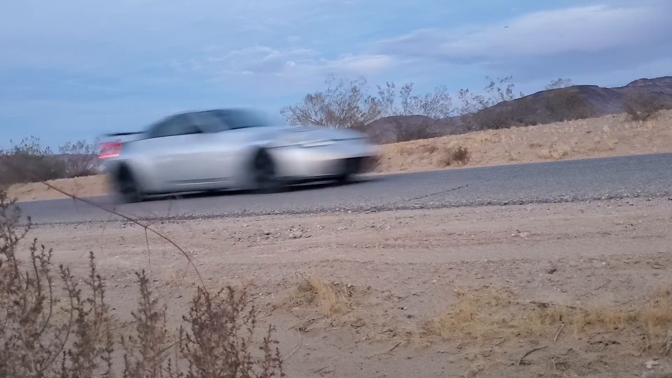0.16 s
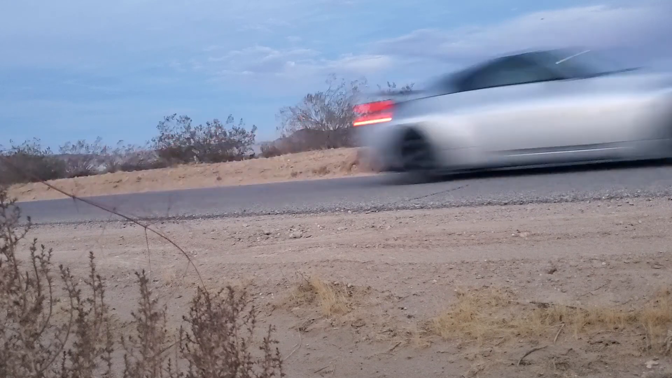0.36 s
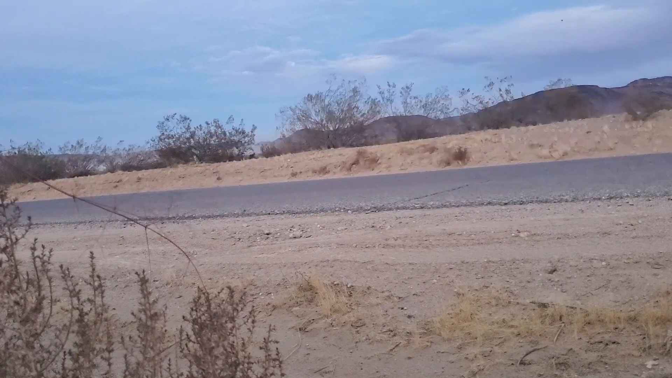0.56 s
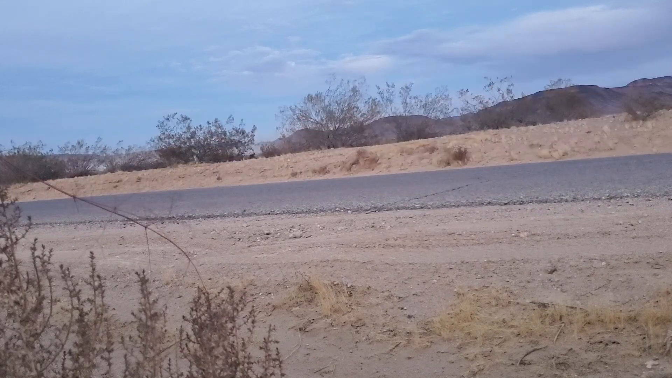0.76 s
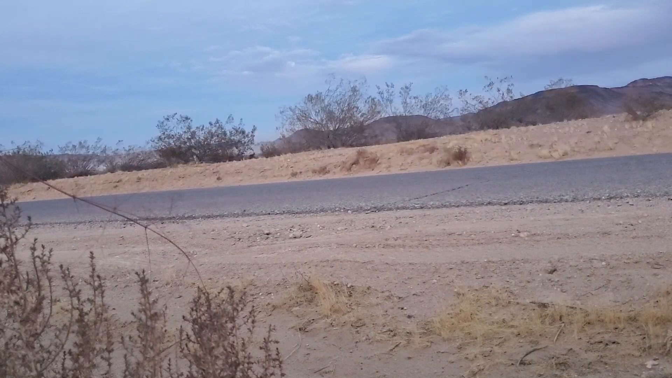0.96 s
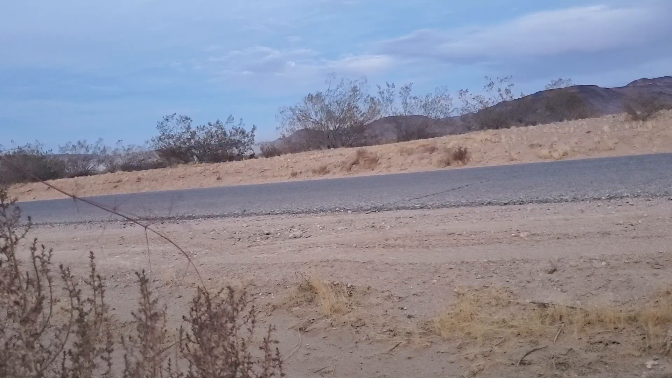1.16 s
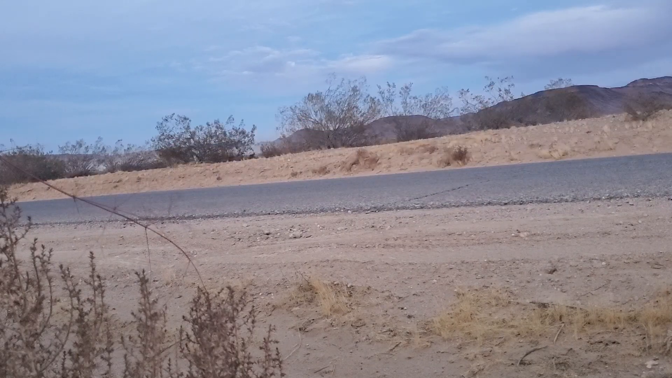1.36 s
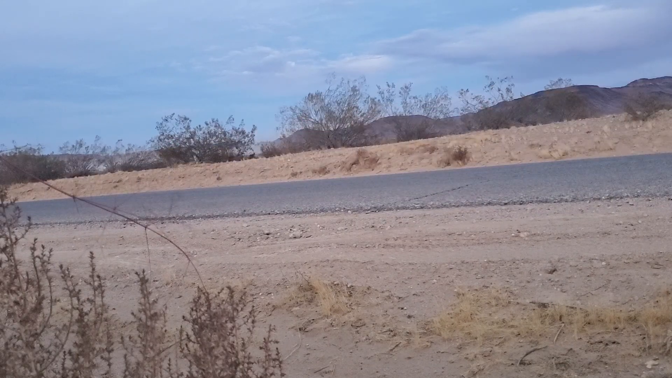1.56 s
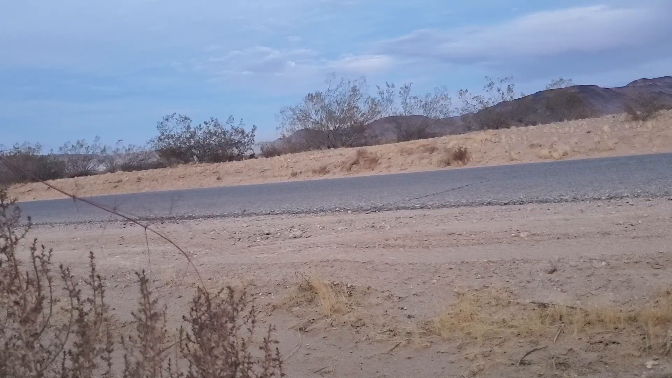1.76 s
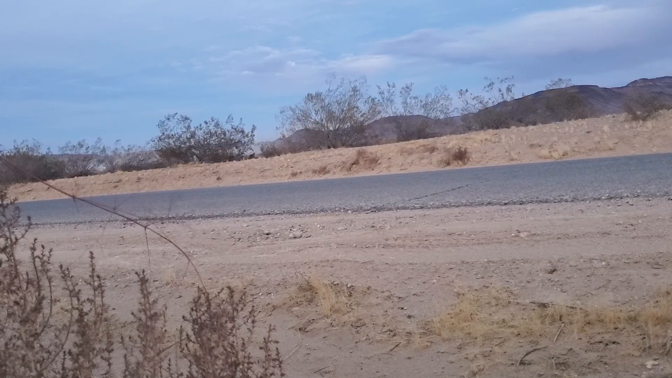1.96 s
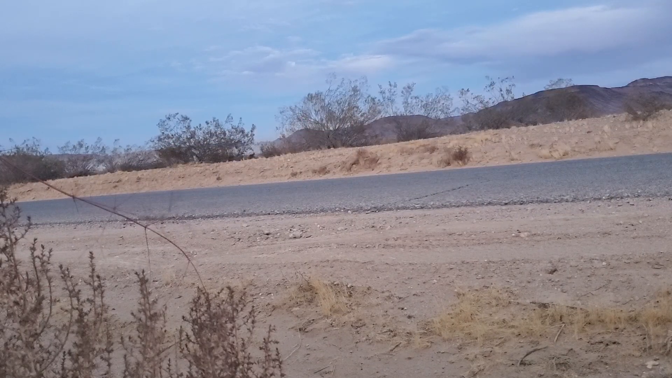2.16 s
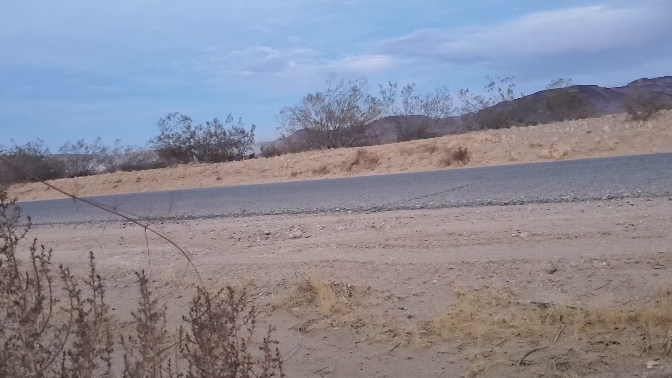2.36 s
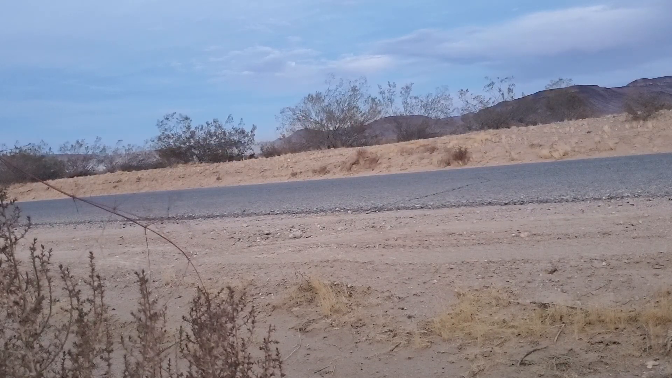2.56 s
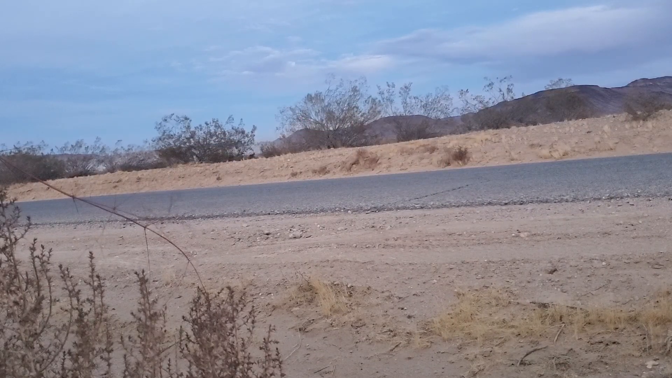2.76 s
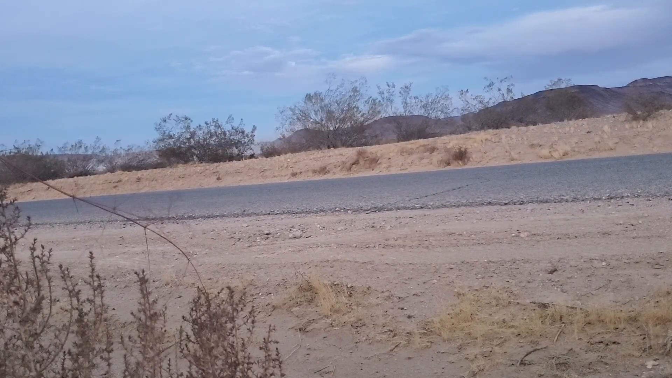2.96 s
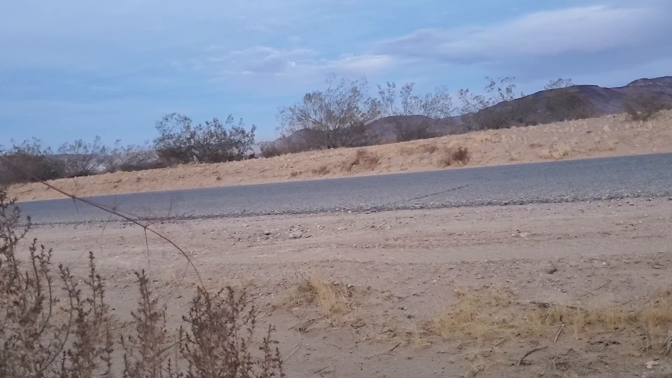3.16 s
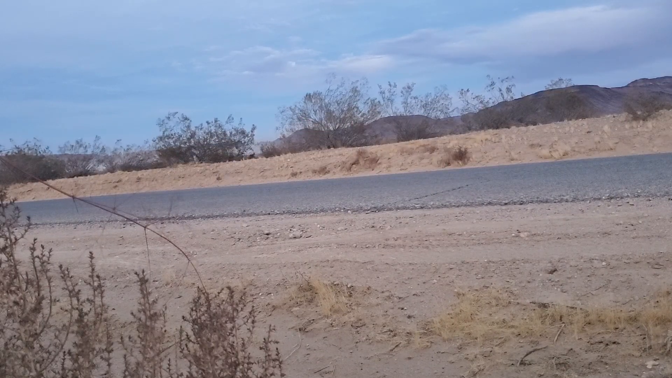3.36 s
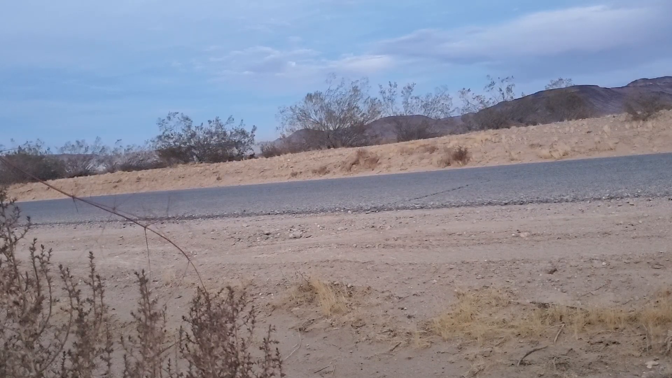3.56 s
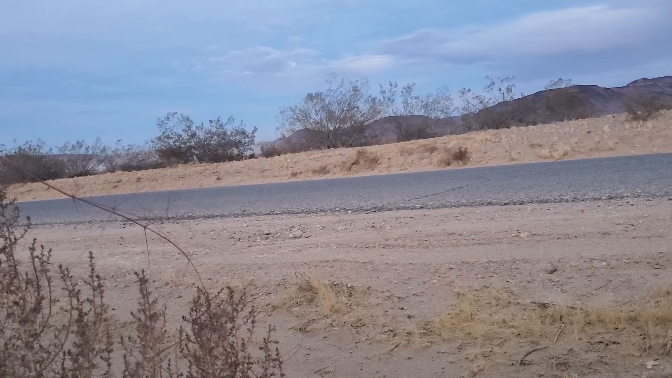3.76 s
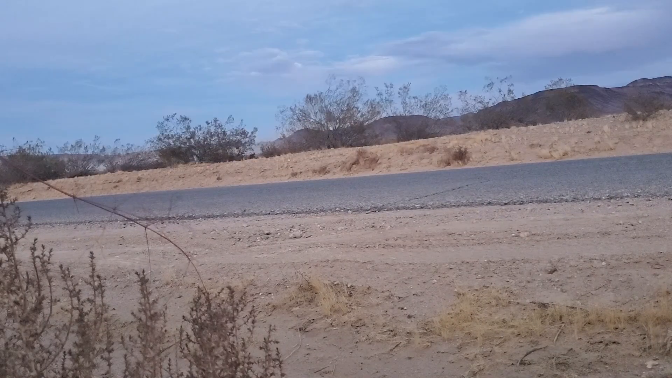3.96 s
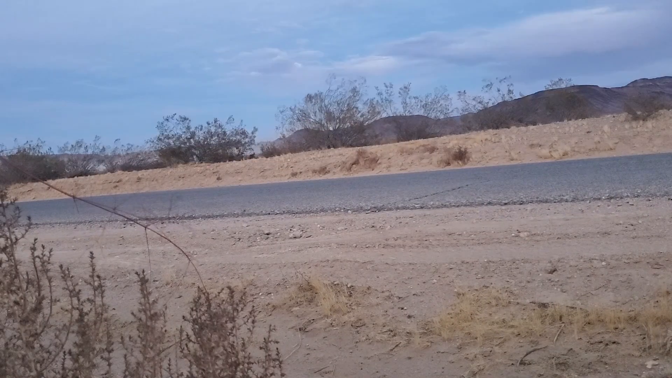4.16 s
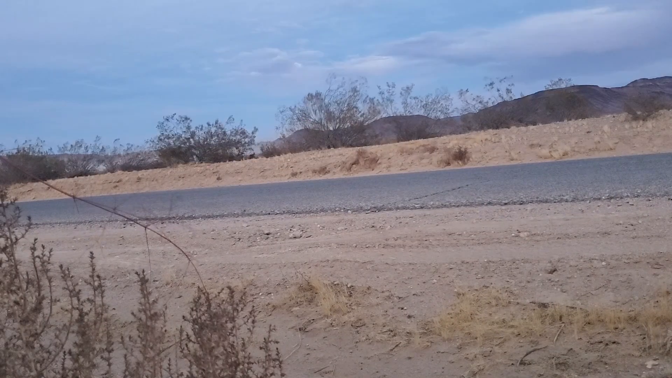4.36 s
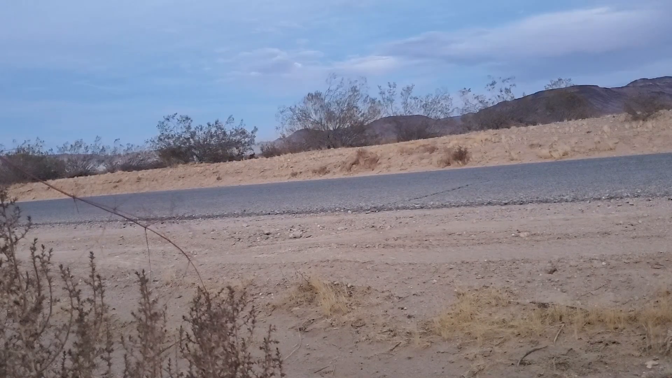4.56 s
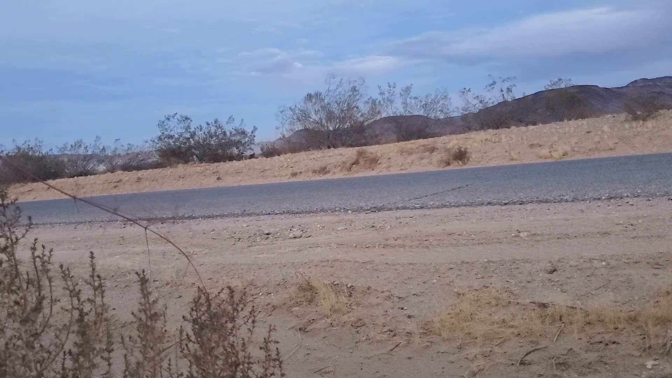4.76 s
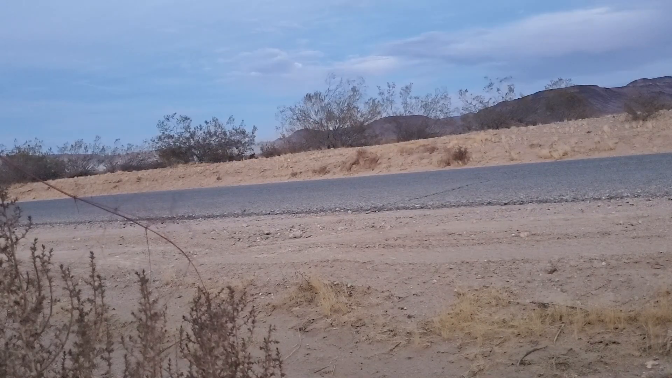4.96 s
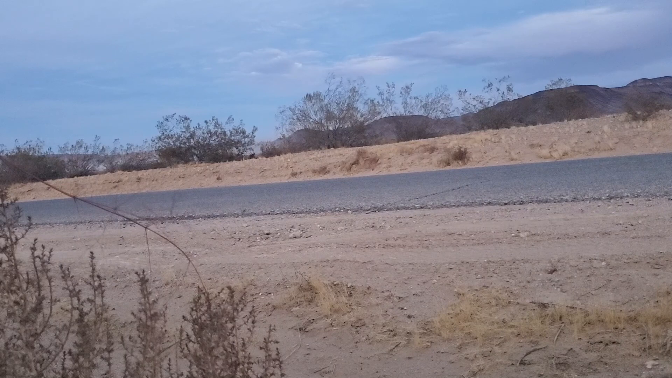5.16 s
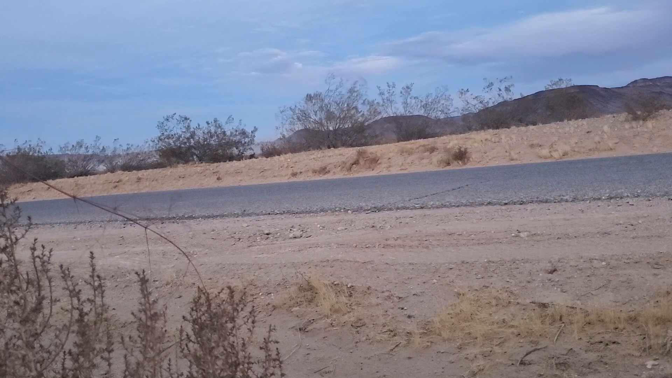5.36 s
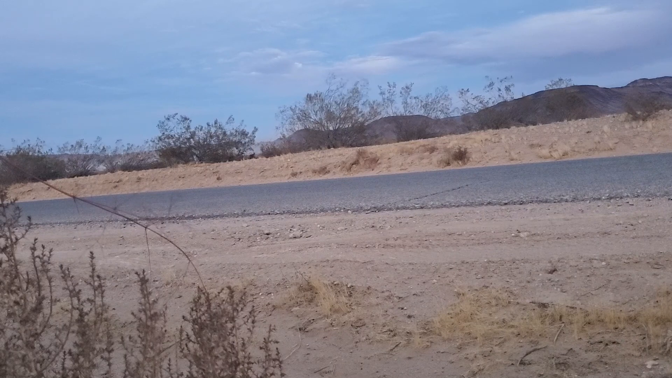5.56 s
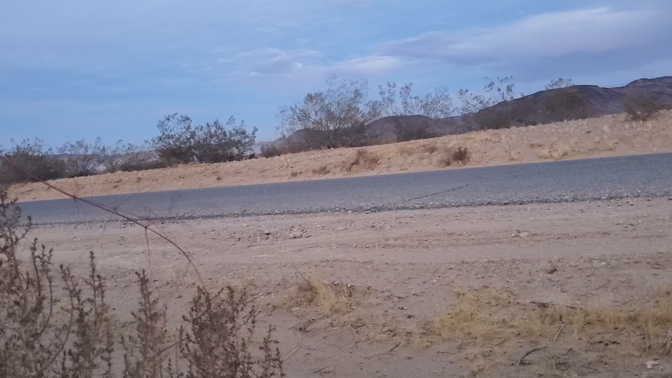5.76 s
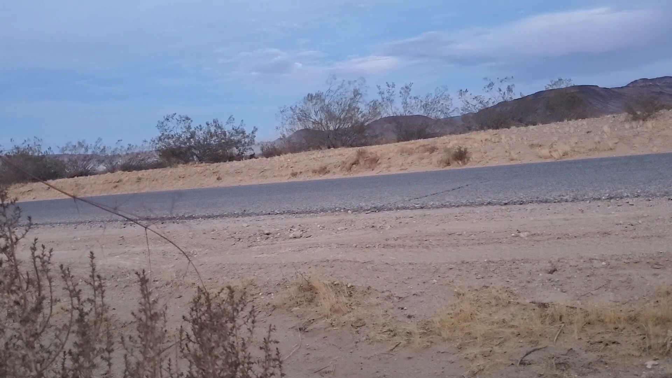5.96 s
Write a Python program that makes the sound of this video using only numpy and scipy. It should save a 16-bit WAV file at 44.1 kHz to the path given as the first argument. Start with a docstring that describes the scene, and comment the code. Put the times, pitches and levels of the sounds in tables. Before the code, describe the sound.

Close, fast car flyby on an open desert road: rush, boom, falling engine note into slow throbs, abrupt click, then distant climbing revs.

```python
"""Turbo car flyby and climbing revs

A turbocharged sports car shoots past, left to right, a few metres off beside an open desert road.
Tyres, wake and turbo whistle flash by as shaped noise; the exhaust booms after them, a stack of firing
orders that runs down to single ringing beats. After a click and a low thump the sound changes abruptly:
the roar drops and the engine note climbs, pulling hard far off. Two spaced microphones hear it side-on."""
import sys
import numpy as np
from scipy import signal
from scipy.fft import rfft, irfft, next_fast_len
from scipy.io import wavfile
from scipy.ndimage import map_coordinates

SR = 44100
rng = np.random.default_rng(int(sys.argv[2]) if len(sys.argv) > 2 else 0)


def waveform_to_disk(signal):
    """Save audio, clipped to [-1, 1], as 16-bit WAV at the path in sys.argv[1]."""
    frames = np.transpose(np.atleast_2d(signal))
    scaled = np.clip(frames, -1, 1) * 32767
    samples = np.round(scaled).astype(np.int16)
    wavfile.write(sys.argv[1], SR, samples)


N = 265923
TIME = np.arange(N) / SR

PASS_S = 0.097  # the rush of gas, tyres and leak is loudest here
CHANGE_S = 3.96  # the sound changes abruptly here, from falling to climbing revs
BEAT_S = 3.503  # one firing is lined up with this moment
APART_HZ, APART_SPREAD_HZ = 31.1, 0.7  # below this firing rate the beats are heard singly
GROUND_HZ, GROUND_WIDTH_HZ = 1180, 1030  # band hollowed out by the ground reflection

# engine passing and running down, as heard: (time [s], firing rate [Hz])
RUN_DOWN_PITCH = [(0, 168), (.18, 158), (.28, 136.2), (.44, 127.7), (.53, 119.6), (.84, 101.1),
                  (1.15, 89.2), (1.7, 72.5), (2.37, 55), (2.9, 41.9), (3.22, 34.9), (3.5, 28.4),
                  (3.86, 21.6), (3.96, 21)]
# engine pulling, its revs climbing, as heard: (time [s], firing rate [Hz])
PULL_PITCH = [(3.972, 41), (4.07, 39), (4.088, 66.4), (4.25, 58.2), (4.37, 63.8), (4.46, 62.9), (4.6, 66.2),
              (5.42, 80.6), (6.03, 92.8)]
# drive of the exhaust note: (time [s], level [dB])
EXHAUST_DRIVE = [(0, -32), (.23, -13), (.28, -3.5), (.36, -5.5), (.44, -10.5), (.53, -8), (.75, -16),
                 (1.5, -19.5), (2.05, -27), (2.35, -26), (2.6, -30.5), (3.3, -30), (4.06, -25), (4.1, -23),
                 (6.03, -17)]
# surges of the note as the car sweeps by: (time [s], half length [s], level [dB])
EXHAUST_SURGES = [(.12, 0.019, 14), (.195, 0.013, 12)]
# weight of firing orders 1 to 4, one row each: (coasting [dB], pulling [dB])
ORDER_WEIGHTS = [(-0.5, -2), (-1, 1), (-3.5, -2.5), (-1, -7)]
# single orders bloom or fade:
# (time [s], half length [s], order 1 [dB], order 2 [dB], order 3 [dB], order 4 [dB])
ORDER_BLOOMS = [(.5, 0.05, -1, 4.5, 0.5, 2), (.72, .07, 1, -19, 7.5, -2), (1.06, 0.25, 0, -1, -7.5, 7),
                (1.36, 0.22, 0.5, 1, -13, -4.5), (1.8, 0.24, -0.5, -0.5, 4.5, 4.5),
                (2.17, .08, 0.5, -3.5, 5, -16), (3.22, 0.085, -0.5, -2, -0.5, 7)]
# what the exhaust lets out behind the car: (frequency [Hz], level [dB])
REAR_EXHAUST_COLOUR = [(32, -35.5), (47, -13), (60, -1.5), (80, -0.84), (105, 0.5), (125, -2), (150, -4.5),
                       (180, -11), (200, -8.5), (220, -11.5), (240, -16), (260, -16.5), (285, -24.5),
                       (320, -32), (375, -21.5), (440, -32.5), (550, -29.5)]
# what the exhaust lets out in front of the car: (frequency [Hz], level [dB])
FRONT_EXHAUST_COLOUR = [(40, -31), (60, -19), (70, -14.5), (80, -10.5), (92, -4), (120, -5), (135, -1),
                        (155, -1.5), (178, -9), (190, -12), (222, -16.5), (245, -7.5), (262, -7),
                        (280, -12), (310, -19.5), (345, -27.5)]
# exhaust pipe resonances: (frequency [Hz], width [Hz], level [dB])
PIPE_RESONANCES = [(107, 17, 14.5), (145.6, 45, -0.5), (201, 3.3, -8.5), (390, 43, -35), (750, 480, -34.5)]
# sharp ticks: (time [s], level [dB], decay [s])
TICK_HITS = [(0.227, -28.5, 0.014), (1.331, -52, 0.014), (1.652, -56, 0.012), (3.226, -58, 0.0086),
             (3.958, -56, 0.0011)]
# rush of the distant car swells and fades: (time [s], half length [s], gas [dB], tyres [dB], leak [dB])
RUSH_SWELLS = [(.83, 0.11, 1, 10.5, 7), (1.15, 0.34, 3, -3.5, 21), (1.65, 0.22, -0.5, 3.5, 14),
               (2.07, 0.19, 3.5, 3, -7), (2.3, 0.22, 3, 8, 17), (2.78, 0.18, 1, 3, 11),
               (3.26, 0.13, 0, 7, 8), (3.52, 0.057, -2.5, -0.5, -7), (3.88, 0.29, -1, 6.5, -12),
               (4.42, 0.19, -0.5, -3.5, 14), (4.8, 0.2, -1, 5.5, 3), (5, 0.092, -1, 2.5, 9),
               (5.55, .1, 0.5, -5.5, 4.5), (5.83, 0.09, 1, -0.5, 5.5), (6.02, 0.087, -2, -1.5, 6.5)]
# spectrum of the exhaust gas: (frequency [Hz], level [dB])
GAS_SPECTRUM = [(120, -28), (220, 2.5), (330, 9.5), (450, 5), (650, 3.5), (850, 4), (1100, -2), (1700, -64)]
# spectrum of the hissing leak: (frequency [Hz], level [dB])
LEAK_SPECTRUM = [(1800, -22), (2600, -11.5), (3100, 0), (3800, -0.5), (4600, -8), (5300, -7.5), (6600, -9),
                 (8200, -22), (11000, -30.5), (16000, -42)]
# turbo whistle as heard: (time [s], pitch [Hz], level [dB])
TURBO_WHISTLE = [(0, 14400, -44), (.11, 13300, -49), (.24, 11500, -49), (.3, 10800, -67.5),
                 (.8, 10400, -130)]
# tread roar until the abrupt change: (frequency [Hz], level [dB])
TYRE_SPECTRUM = [(500, -29.5), (850, -3), (1150, 8.5), (1550, 4), (1900, -1.5), (2350, -7.5), (2800, -15.5),
                 (3600, -25), (6000, -63.5)]
# tread roar ahead of the car: (frequency [Hz], level [dB])
AHEAD_TYRE_SPECTRUM = [(500, -23), (850, 4), (1150, -1), (1500, 4), (1900, 0.5), (2350, -5), (2800, -6),
                       (3600, -14.5), (6000, -57)]
# how far the ground reflection cancels its band: (time [s], depth [0-1])
GROUND_DEPTH = [(0, 0.96), (.6, 0.15), (1.3, 0), (2.6, 0.16), (3.9, 0.9), (4.3, 0), (4.9, 0.8), (5.5, 0.94),
                (6.03, 0.45)]
# spectrum of the wake: (frequency [Hz], level [dB])
WAKE_SPECTRUM = [(20, -22.5), (45, -7), (80, 4), (140, 6.5), (220, 0.5), (330, -8), (480, -16), (900, -69)]
# sprays of sand from the tyres: (time [s], half length [s], level [dB])
SAND_SPRAYS = [(.1, .02, 3.5), (.178, 0.011, 6), (.558, 0.036, 3.5)]
# spectrum of the sand: (frequency [Hz], level [dB])
SAND_SPECTRUM = [(4000, -34.5), (7000, 3), (9000, -4), (12000, -2), (15500, 0.5)]
# spectrum of the open air: (frequency [Hz], level [dB])
AIR_SPECTRUM = [(20, -0.5), (60, -1), (200, -10), (700, -27), (2000, -30.5), (5000, -44), (10000, -56),
                (16000, -67.5)]


def exhaust(hz, turns, orders_db, away_db=-5, towards_db=-10, uneven_db=-16, flutter_db=0.1,
            rasp_db=3.0, wander_rad=0.65, count=10):
    """Each firing kicks the pipe: four strong orders, then unsteady overtones that follow its resonances."""
    strong = len(orders_db)
    grid = np.geomspace(10, SR / 2, 2048)
    response = pipe_response(grid)
    pipe_db = 20 * np.log10(abs(response))
    pipe_phase = np.unwrap(np.angle(response))

    def gain_db(k):
        return np.interp(k * hz, grid, pipe_db)

    def tone(k, slip=0):
        phase = 2 * np.pi * k * turns + np.interp(k * hz, grid, pipe_phase) + slip
        return -np.sqrt(2) * np.cos(phase)

    def power_db(levels):
        return 10 * np.log10(sum(undb(db) ** 2 for db in levels))

    # how hard the pipe is driven: the power of the upper strong orders over the pipe's gain at their pitch
    drive_db = power_db(orders_db[1:]) - power_db([gain_db(k) for k in range(2, strong + 1)])
    out = sum(undb(db + flutter_db * walk(30)) * tone(k) for k, db in enumerate(orders_db, 1))
    # overtones are beamed backwards, so they are stronger while the car drives away
    overtone_db = np.interp(TIME, [3, 4], [away_db, towards_db])
    for k in range(strong + 1, count + 1):
        level_db = drive_db + gain_db(k) + overtone_db + rasp_db * walk(14)
        # the higher the overtone, the more its timing wanders
        slip = wander_rad * (k * hz / 400) ** 2 * walk(20)
        out += undb(level_db) * tone(k, slip)
    # unequal cylinders add weak, restless lines between the orders
    for k in np.arange(1, count // 2) + .5:
        level_db = drive_db + np.minimum(gain_db(k), gain_db(strong)) + uneven_db
        out += undb(level_db) * walk(16) * tone(k)
    return out


def pipe_response(hz, muffler_hz=260):
    """Complex gain of the exhaust pipe's resonances, dulled by the muffler."""
    rings = sum(undb(db) / (1 + 1j * (hz / f - f / hz) * f / width) for f, width, db in PIPE_RESONANCES)
    return rings / (1 + 1j * hz / muffler_hz)


def order_levels(hz):
    """Level of each strong firing order in dB: drive, load, and the exhaust's gain at its pitch."""
    drive_db = curves(EXHAUST_DRIVE)[0] + swells(EXHAUST_SURGES)[0]

    def gain_db(points, k):
        point_hz, point_db = np.transpose(points)
        return np.interp(np.log(k * hz), np.log(point_hz), point_db)

    steady_db = []
    for k, (coast_db, pull_db) in enumerate(ORDER_WEIGHTS, 1):
        coasting = coast_db + gain_db(REAR_EXHAUST_COLOUR, k)
        pulling = pull_db + gain_db(FRONT_EXHAUST_COLOUR, k)
        steady_db.append(np.where(TIME < CHANGE_S, coasting, pulling))
    return drive_db + steady_db + swells(ORDER_BLOOMS)


def beats(hz, turns, peak_db=-22, sag_db_per_hz=0.5, ring_hz=105, upper_hz=210, upper_db=-11,
          swell_s=0.0088, lead=0.21, scatter_db=1):
    """At low revs each firing swells and dies in the pipe before the next, weaker as the revs fall."""
    age = (turns + lead) % 1 / hz  # seconds since the last firing; lead is a share of a firing period
    envelope = (age / swell_s) ** 2 * np.exp(2 - 2 * age / swell_s)

    def ring(pitch):
        return -np.cos(2 * np.pi * pitch * (age - swell_s))

    body = ring(ring_hz) + undb(upper_db) * ring(upper_hz)
    sag_db = sag_db_per_hz * np.maximum(APART_HZ - hz, 0)
    return envelope * body * undb(peak_db - sag_db + scatter_db * walk(24.65))


def thump(hz=90, db=-18, decay_s=.016):
    """A low, fast-dying sine thump marks the abrupt change of sound."""
    age = np.maximum(TIME - CHANGE_S, 0)
    return -undb(db) * np.sin(2 * np.pi * hz * age) * np.exp(-age / decay_s)


def ticks():
    """Short bright cracks: noise bursts that start at once and die exponentially."""
    envelope = sum(undb(db) * (TIME >= s) * np.exp(-abs(TIME - s) / decay) for s, db, decay in TICK_HITS)
    return envelope * noise([(300, -11.5), (1500, 8.5), (4000, 2.0), (7000, -9.0), (15000, -14)])


def exhaust_gas(turns, gain, puff_db=.7, trim_db=3):
    """Turbulent gas rushes from the pipe, rippling faintly with each firing."""
    return noise(GAS_SPECTRUM) * puffs(turns, puff_db) * gain * undb(trim_db)


def leak(turns, gain, puff_db=.65, trim_db=1, flicker_db=1.6):
    """A flickering hiss of leaking gas, rippling faintly with each firing."""
    return noise(LEAK_SPECTRUM) * puffs(turns, puff_db) * gain * undb(trim_db + flicker_db * walk(25))


def puffs(turns, depth_db):
    """A gain that ripples faintly once a firing, by an uneven amount."""
    return unit(undb(depth_db * (1.0 + walk(55)) * np.cos(2 * np.pi * turns)))


def turbo(width_hz=450):
    """The compressor's airy whistle, a carrier blurred by slow noise, drops in pitch as the car goes by."""
    hz, db = curves(TURBO_WHISTLE)
    lowpass = signal.butter(2, width_hz, fs=SR, output="sos")
    blur = signal.sosfilt(lowpass, rng.standard_normal((3, N)))
    return unit(blur * np.cos(2 * np.pi * np.cumsum(hz) / SR)) * undb(db)


def tyres(gain, trim_db=4, flicker_db=1.0):
    """Tread roar, brighter after the abrupt change; the ground reflection hollows out the middle."""
    roar = np.where(TIME < CHANGE_S, noise(TYRE_SPECTRUM), noise(AHEAD_TYRE_SPECTRUM))
    b, a = signal.iirpeak(GROUND_HZ, GROUND_HZ / GROUND_WIDTH_HZ, fs=SR)
    band = signal.lfilter(b, a, roar)
    depth = np.clip(curves(GROUND_DEPTH)[0], 0, 1)
    return (roar - depth * band) * gain * undb(trim_db + flicker_db * walk(15))


def rush_gains():
    """Gains of exhaust gas, tyres and leak before their trims: the close pass plus the swells from afar."""
    near = [flyby(peak_db=-25.0, width_s=0.22, fall=1.39),
            flyby(peak_db=-22.5, width_s=0.36, fall=2.77),
            flyby(peak_db=-38.0, width_s=0.34, fall=2.55)]
    far_db = [distant(coast_db=-46.5, pull_db=-50.5, rise_db_per_s=3),
              distant(coast_db=-53.5, pull_db=-65.5, rise_db_per_s=6.5),
              distant(coast_db=-84, pull_db=-83, rise_db_per_s=6.0)]
    return np.hypot(near * (TIME < CHANGE_S), undb(far_db + swells(RUSH_SWELLS)))


def wake(peak_db=-13.0, peak_s=0.24, build_db_per_s=22, drop_db_per_s=280, far_s=1.0, bass_hz=190, order=2):
    """Turbulence around the body builds until the car is past; deep buffeting is strongest close by."""
    air = noise(WAKE_SPECTRUM)[0]
    highpass = signal.butter(order, bass_hz, "high", fs=SR, output="sos")
    thin = signal.sosfiltfilt(highpass, air)
    buffet = np.interp(TIME, [0, far_s / 2, far_s], [1, 1, .35])  # share of the bass kept
    gust_drop_db = np.maximum(build_db_per_s * (peak_s - TIME), drop_db_per_s * (TIME - peak_s))
    gust = undb(peak_db - gust_drop_db)
    near = flyby(peak_db=-25.5, width_s=0.38, fall=1.7)
    far = undb(distant(coast_db=-35.5, pull_db=-43, rise_db_per_s=6))
    trail = np.hypot(near, far)
    return (thin + buffet * (air - thin)) * np.hypot(gust, trail)


def sand(grain_db=3, start_db=-40.5, sag_db_per_s=17, gone_s=.6, fade_db_per_s=30):
    """Dense tiny grains of unequal size, soon out of earshot."""
    size_db = np.minimum(grain_db * rng.exponential(size=N), 20)
    grains = rng.standard_normal((3, N)) * undb(size_db)
    fade_db = sag_db_per_s * TIME + fade_db_per_s * np.maximum(TIME - gone_s, 0)
    return colour(grains, SAND_SPECTRUM) * undb(start_db - fade_db + swells(SAND_SPRAYS)[0])


def open_air(db=-54.5):
    """The quiet, mostly low, steady noise of the open desert."""
    return undb(db) * noise(AIR_SPECTRUM)


def flyby(peak_db, width_s, fall):
    """Gain going by: falls with a power of the distance, which has grown by root 2 after width_s."""
    return undb(peak_db) / np.hypot(1, (TIME - PASS_S) / width_s) ** fall


def distant(coast_db, pull_db, rise_db_per_s):
    """Level far down the road in dB: steady while coasting, then growing as the engine pulls."""
    return np.where(TIME < CHANGE_S, coast_db, pull_db + rise_db_per_s * (TIME - CHANGE_S))


def swells(rows):
    """Bell-shaped level changes in dB, summed; one curve for each level column."""
    return sum(np.outer(db, np.exp(-((TIME - s) / half) ** 2)) for s, half, *db in rows)


def walk(rate):
    """Smooth chance with about `rate` turns a second and a spread near 1."""
    knots = rng.standard_normal(4096)
    return np.interp(TIME * rate, np.arange(len(knots)), knots)


def noise(points):
    """Three unrelated coloured noises: the direct sound, and what is scattered to the left and right."""
    return colour(rng.standard_normal((3, N)), points)


def colour(x, points):
    """Give a sound a spectrum of (frequency [Hz], level [dB]) points, at rms 1."""
    hz, db = np.transpose(points)
    size = next_fast_len(N)
    bins = np.maximum(np.fft.rfftfreq(size, 1 / SR), 1)
    gain = undb(np.interp(np.log(bins), np.log(hz), db))
    return unit(irfft(rfft(x, size) * gain, size)[..., :N])


def unit(x):
    """Scale to rms 1."""
    return x / np.sqrt(np.mean(x ** 2))


def curves(rows):
    """Each column of a table after the time, as a value per sample."""
    s, *columns = np.transpose(rows)
    return [np.interp(TIME, s, c) for c in columns]


def undb(db):
    """Decibels to gain."""
    return 10 ** (np.asarray(db) / 20)


def microphones(tone, rush, hiss, spacing_ms=0.48, centre_s=.21, sweep_s=0.3, scatter_db=-10,
                hiss_scatter_db=7, shade_db=2.26):
    """Direct sound reaches the pair at different times; scattered sound, mostly treble, is unrelated."""
    bearing = (TIME - centre_s) / np.hypot(TIME - centre_s, sweep_s)  # -1 left, 1 right
    half_lag = spacing_ms * bearing * SR / 2000  # samples

    def pair(x):
        sides = [[np.arange(N) + side * half_lag] for side in (-1, 1)]
        return np.array([map_coordinates(x, side, order=3, mode="nearest") for side in sides])

    air = 0
    for sound, db in (rush, scatter_db), (hiss, scatter_db + hiss_scatter_db):
        share = np.clip(undb(db), 0, 1)
        direct = pair(np.sqrt(1 - share ** 2) * sound[0])
        air = air + direct + share * sound[1:]
    # the housing shades the far microphone from the rush and hiss, not from the tone
    return pair(tone) + air * undb(shade_db * np.array([-bearing, bearing]) / 2)


def scene():
    """Exhaust note and rushing air move together along the road, over quiet open air."""
    hz, = curves(RUN_DOWN_PITCH + PULL_PITCH)
    turns = np.cumsum(hz) / SR  # firings so far
    turns = turns - np.interp(BEAT_S, TIME, turns)
    gas_gain, tyre_gain, leak_gain = rush_gains()
    # crossfade from a continuous note to single beats at low revs
    apart = .5 + .5 * np.tanh((APART_HZ - hz) / (2 * APART_SPREAD_HZ))
    engine = (1 - apart) * exhaust(hz, turns, order_levels(hz)) + apart * beats(hz, turns)
    tone = engine + thump() + wake()
    rush = exhaust_gas(turns, gas_gain) + tyres(tyre_gain)
    hiss = leak(turns, leak_gain) + turbo()
    car = microphones(tone, rush, hiss)
    scattered = sand() + ticks() + open_air()
    return car + scattered[1:]


def record(dry, left_db=-1.96, top_hz=15750):
    """The left microphone is a little weaker than the right; the top is cut steeply."""
    balance = undb(np.array([[left_db], [-left_db]]) / 2)
    lowpass = signal.ellip(10, .1, 80, top_hz, fs=SR, output="sos")
    return signal.sosfilt(lowpass, dry * balance)


dry = scene()
out = record(dry)
waveform_to_disk(out)
```